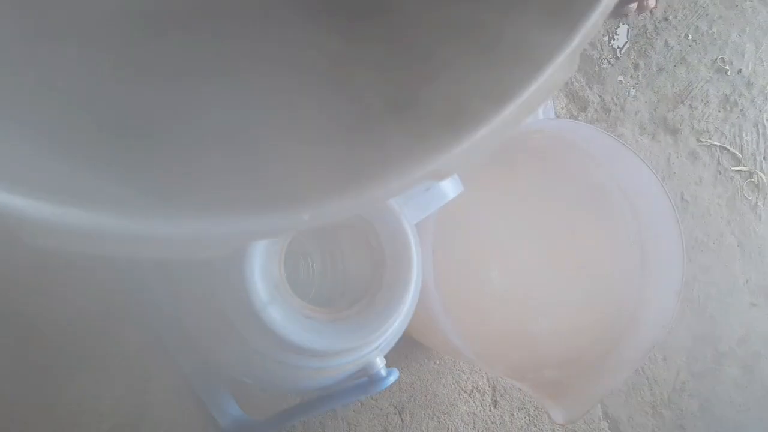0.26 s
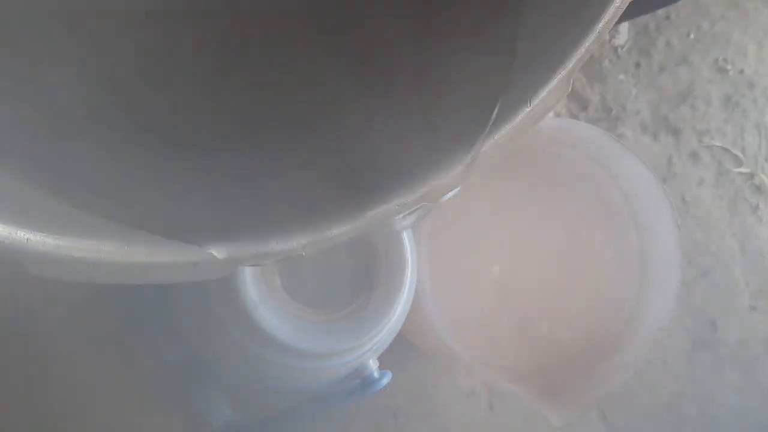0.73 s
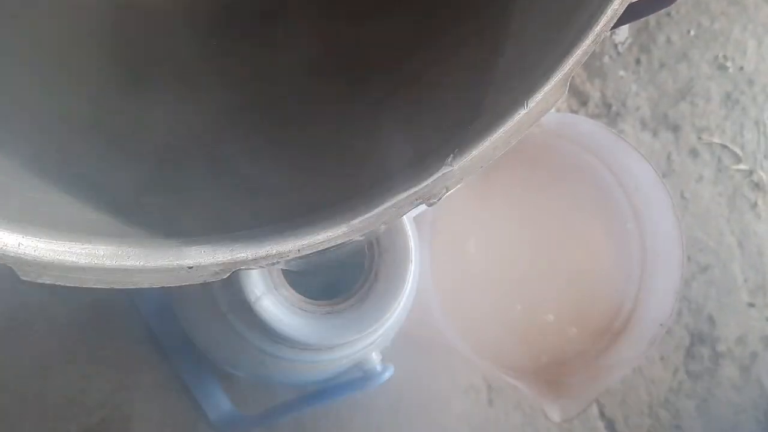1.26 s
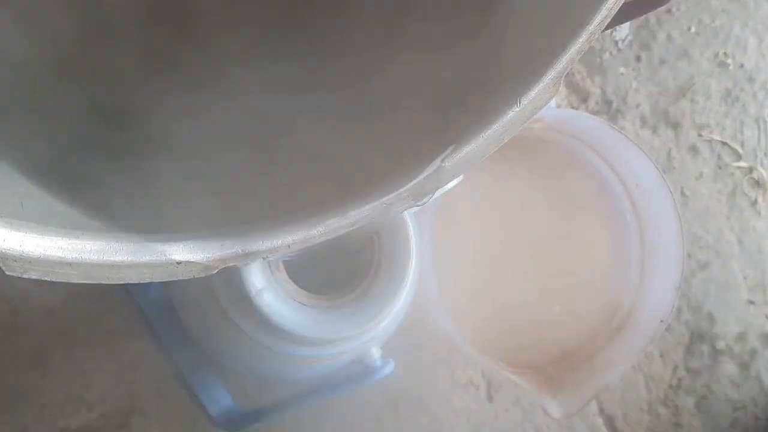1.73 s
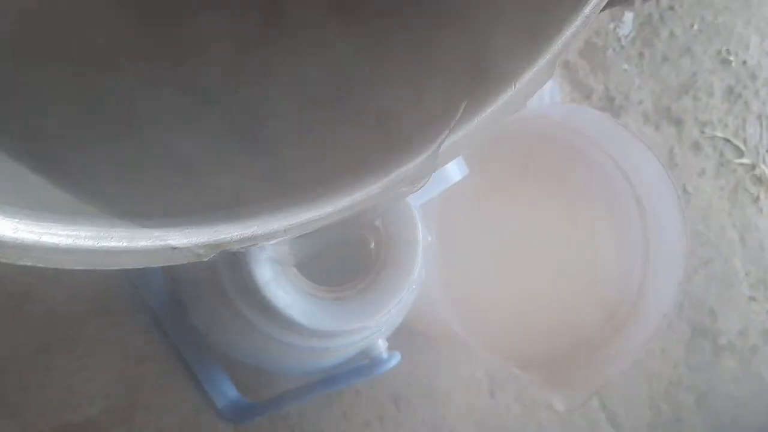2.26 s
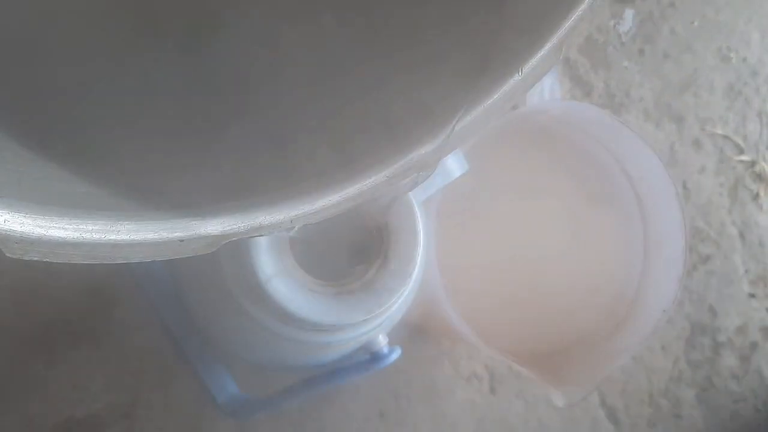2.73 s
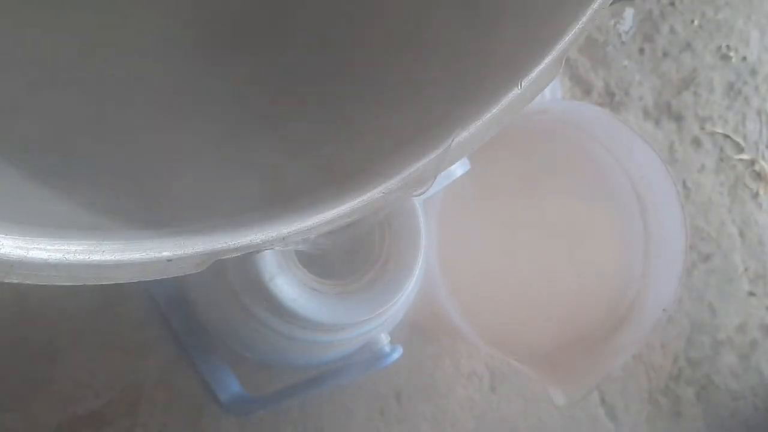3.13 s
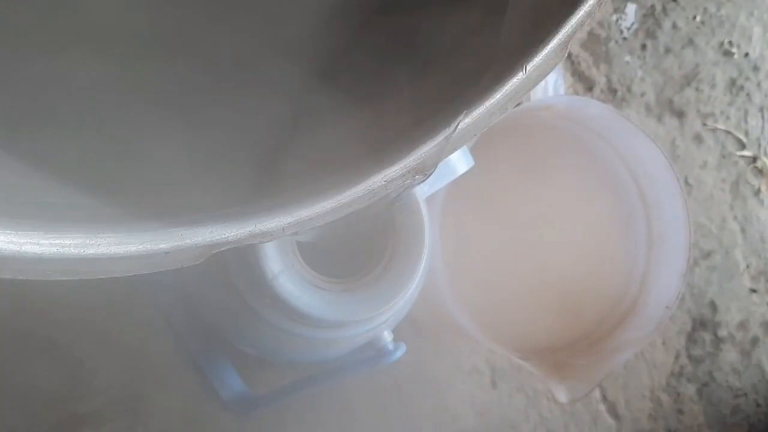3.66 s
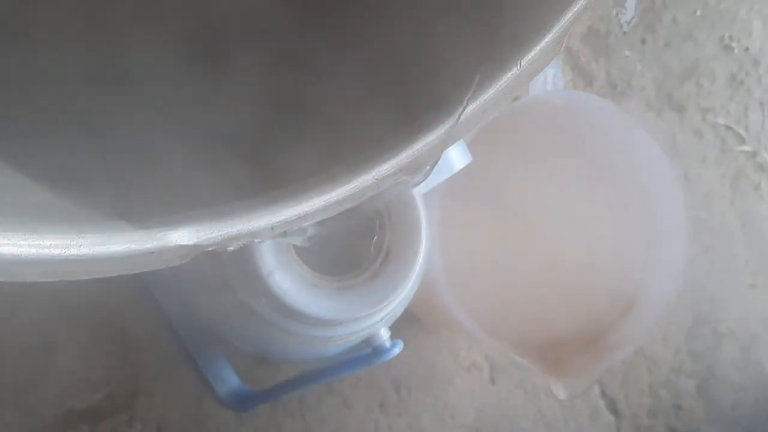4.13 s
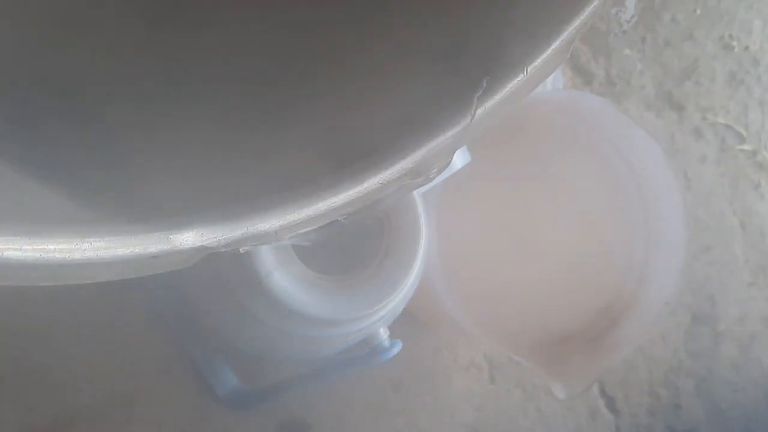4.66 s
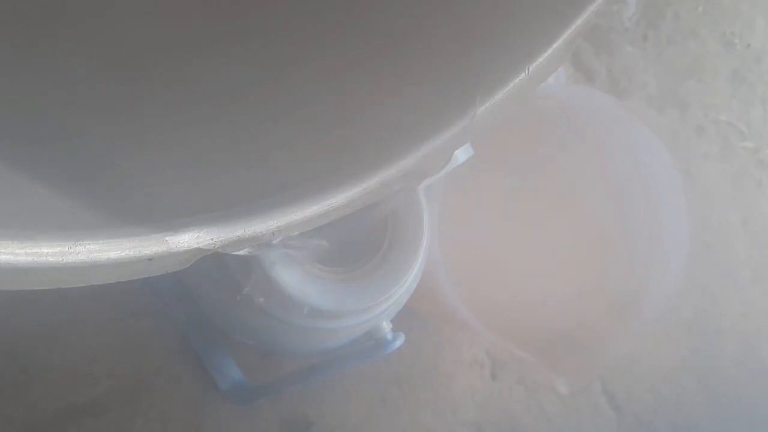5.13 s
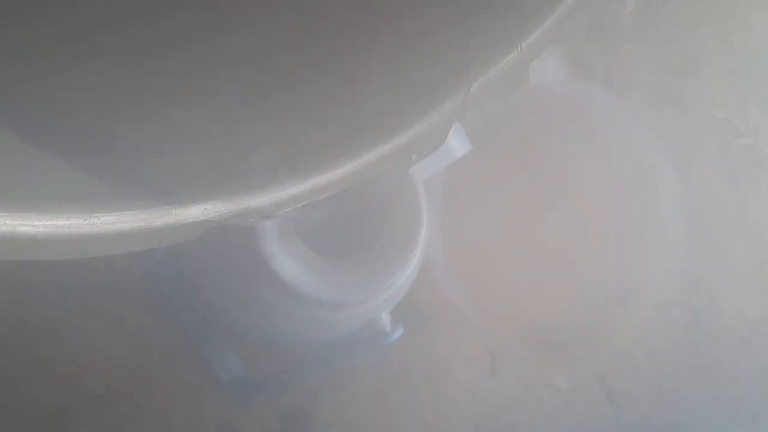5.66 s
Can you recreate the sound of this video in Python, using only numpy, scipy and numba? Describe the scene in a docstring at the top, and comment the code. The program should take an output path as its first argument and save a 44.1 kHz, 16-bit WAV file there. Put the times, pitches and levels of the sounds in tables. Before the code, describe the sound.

A quiet kitchen with low rumble, a little stronger on the left, and thin high hiss, heard closely in stereo. Around 0.1 s and again near 0.7 s the metal pot makes soft gritty scuffs and light taps. At 1.1 s water abruptly strikes the flask: bright spatter, slapping drops, and clear plinking bubbles over a hollow ring left of centre, with fine spray slightly right. The stream surges unevenly, with an especially strong splash near 2.6 s. From about 2 s low round glugs become prominent, ringing longer as the water deepens. The hollow tone climbs steadily from roughly 1.1 to nearly 2 kHz, while a low neck hum swells to about 4 s. The flow weakens from 4.8 s. At 5.0 s a hard clattering metal knock rings briefly, with smaller contacts after it. Faint scuffs follow at 5.3-5.5 s as the last thin trickle dwindles until nearly 5.9 s.

```python
"""Hot water into a vacuum flask

In a kitchen, hot water is poured from a metal pot into a vacuum flask, before two microphones.
Resonated noise and impacts make the air column, ringing higher as the flask fills; filtered clicks the spray.
Rising sine tones make the bubbles; noise and decaying metal modes the pot's scuffs and late hard knock.
Fainter kitchen reflections of both follow, over a low rumble and a thin hiss of filtered noise."""
import sys
import numpy as np
from scipy import signal
from scipy.fft import rfft, irfft, next_fast_len
from scipy.io import wavfile
from scipy.ndimage import uniform_filter1d
from numba import njit

SR = 44100
rng = np.random.default_rng(int(sys.argv[2]) if len(sys.argv) > 2 else 0)


def to_wav(s):
    """Save 16-bit WAV."""
    ch = np.atleast_2d(s).T  # columns
    pcm = np.round(np.clip(ch, -1, 1) * 32767)  # PCM
    wavfile.write(sys.argv[1], SR, pcm.astype(np.int16))


N = 259749

# All levels are relative: layer gains, panning and the microphones still act on them.


def amp(db):
    """Decibels to gain."""
    return 10 ** (np.asarray(db) / 20)


def unit(x):
    """Scale to rms 1."""
    return x / np.sqrt(np.mean(x ** 2) + 1e-20)


def even(x, span):
    """Hold the rms near 1 over the given span of seconds, keeping faster detail."""
    power = uniform_filter1d(np.mean(x ** 2, axis=0), int(span * SR) + 1)
    return x / np.sqrt(np.abs(power) + 1e-14)


def in_time(rows):
    """Each column of a curve at every sample."""
    s, *columns = np.transpose(rows)
    return [np.interp(np.arange(N) / SR, s, c) for c in columns]


def pan(db):
    """Left and right gains for a level difference; positive places the sound to the left."""
    return amp(np.array([[db], [-db]]) / 2)


def add(out, s, sound):
    """Mix a sound in at a time in seconds."""
    at = int(s * SR)
    out[:, at:at + sound.shape[-1]] += sound[..., :N - at]


def fade(t, t60):
    """Exponential decay by 60 dB in t60 seconds."""
    return np.exp(-np.log(1000) * t / t60)


def cut(x, hz, kind, order=2):
    """Butterworth filter."""
    sections = signal.butter(order, min(hz, SR / 2 - 1), kind, fs=SR, output="sos")
    return signal.sosfilt(sections, x + 1e-18)


def colour(x, spectrum):
    """Causal (minimum-phase) filter with the given spectrum and power gain 1."""
    size = 8192
    hz, db = np.transpose(spectrum)
    log_hz = np.log(np.maximum(np.fft.rfftfreq(size, 1 / SR), 1))
    # the gain falls 12 dB per halving of frequency below the first row
    below = np.minimum(log_hz - np.log(hz[0]), 0)
    gain = amp(np.interp(log_hz, np.log(hz), db)) * np.exp(2 * below)
    # folding the cepstrum makes the phase minimum
    cepstrum = irfft(np.log(gain))
    cepstrum[1:size // 2] *= 2
    cepstrum[size // 2 + 1:] = 0
    response = irfft(np.exp(rfft(cepstrum)))
    return signal.fftconvolve(x, response[None] / np.linalg.norm(response))[:, :x.shape[-1]]


def noise(alike, size=N):
    """White noise, partly shared by both channels."""
    share = np.clip(alike, 0, 1)
    common = rng.standard_normal(size)
    return np.sqrt(share) * common + np.sqrt(1 - share) * rng.standard_normal((2, size))


def drift(rate):
    """Random wander through normal values of spread 1, rate of them a second, joined by lines."""
    knots = rng.standard_normal(4096)
    return np.interp(np.arange(N) / SR * rate, np.arange(len(knots)), knots)


def grains(per_s, spread_db):
    """Random clicks: many small, a few large."""
    sizes = amp(spread_db * np.minimum(rng.exponential(1, N), 4)) * rng.choice([-1, 1], N)
    return sizes * (rng.random(N) < per_s / SR)


@njit
def resonate(x, hz, width, sr):
    """A two-pole resonance whose centre moves."""
    y, r = np.zeros_like(x), np.exp(-np.pi * width / sr)
    for i in range(2, x.shape[1]):
        a = 2 * r * np.cos(2 * np.pi * hz[i] / sr)
        for c in range(2):
            y[c, i] = x[c, i] - x[c, i - 2] + a * y[c, i - 1] - r * r * y[c, i - 2]
    return y


def bubble_cloud(low_hz, high_hz, per_s, cycles, spread_db, count=20):
    """Bubbles of many sizes ring for some cycles, each struck by its own random clicks."""
    clicks = grains(per_s, spread_db)
    dealt = rng.integers(0, count, N)
    out = np.zeros((2, N))
    clicks = clicks * noise(alike=0.73)   # scatters the bubbles between the sides
    for k, hz in enumerate(np.geomspace(low_hz, high_hz, count)):
        r, w = fade(1 / SR, cycles / hz), 2 * np.pi * hz / SR
        struck = clicks * (dealt == k) + 1e-18
        out += hz * signal.lfilter([1], [1, -2 * r * np.cos(w), r * r], struck)
    return unit(np.diff(out, prepend=0))


def bubbles(rows, swell_s, t60, rise, longer=0, slower=0):
    """Each bubble swells, rings and rises in pitch; later ones may ring longer and swell more slowly."""
    out, t = np.zeros((2, N)), np.arange(SR // 4) / SR
    for s, db, hz in rows:
        poured = s - POUR_START_S
        swell = 1 - np.exp(-(t / (swell_s + slower * poured)) ** 2)
        shape = swell * fade(t, t60 + longer * poured)
        add(out, s, amp(db) * shape / shape.max() * np.sin(2 * np.pi * hz * t * (1 + rise * t)))
    return out


POUR_START_S, POUR_ATTACK_S = 1.098, 0.0038


def poured_s():
    """Seconds since the stream reached the flask, at every sample."""
    return np.maximum(np.arange(N) / SR - POUR_START_S, 0)


DEEP_S, DEEPENS_S = 2.4, 0.27   # when the water starts to count as deep, and how long the change takes


def depth():
    """0 while the water is shallow, 1 once it is deep, at every sample."""
    return np.clip((np.arange(N) / SR - DEEP_S) / DEEPENS_S, 0, 1)


USUAL_FLOW_DB = -46.5


def follow(flow_db, db, share):
    """Gain of a layer that has level db at the usual flow and follows a share of the flow's swing."""
    return amp(db + share * (flow_db - USUAL_FLOW_DB))


# strength of the stream, as the level of its splash: t/s, level/dB
STREAM_STRENGTH = [(1.1, -52), (1.24, -44), (1.43, -55), (1.52, -57), (1.64, -55.5), (1.8, -55),
                   (1.92, -54), (2.05, -48.5), (2.22, -52), (2.5, -46.5), (2.78, -49.5), (2.91, -55),
                   (3.1, -50), (3.6, -48.5), (4.3, -53.5), (4.44, -50), (4.8, -55), (5.35, -58), (5.7, -65)]
# moments when the stream thickens: t/s, splash level/dB, t60/s
STREAM_GUSHES = [(1.107, -38.5, 0.12), (1.179, -38.5, 0.19), (1.301, -41, 1), (1.469, -38.5, 0.25),
                 (1.531, -41.5, 0.2), (1.585, -45, 0.1), (1.675, -39, 0.11), (1.731, -36.5, 0.1),
                 (1.765, -39, 0.29), (2.0, -43, 0.26), (2.079, -46.5, 0.95), (2.238, -42.5, .12),
                 (2.323, -42, 0.11), (2.568, -29.5, 0.064), (2.63, -38.5, 0.17), (2.674, -51, 0.18),
                 (3.039, -37, 0.1), (3.16, -50, 0.12), (3.255, -41, 0.16), (3.44, -48, 0.32),
                 (3.533, -40.5, 0.46), (3.8, -47, 0.5), (4.23, -58, 0.076), (4.48, -42, 0.24)]


def gushes():
    """The stream's level in dB with its gushes: each swells at once, dies away and adds in power."""
    t = np.arange(SR // 2) / SR
    power = amp(in_time(STREAM_STRENGTH)[0] + 1.9 * drift(rate=28))[None] ** 2
    for s, db, t60 in STREAM_GUSHES:
        swell = 1 - np.exp(-t / 0.002)
        add(power, s, (amp(db) * swell * fade(t, t60)) ** 2)
    return 10 * np.log10(power[0])


def strays(count, until_s, db, spread_db, low_hz=1, high_hz=1):
    """Events at random moments of the pour, partly following the flow: rows of t/s, level/dB, f/Hz."""
    when, strength, size = rng.random((count, 3)).T
    s = POUR_START_S + when * (min(until_s, POT_KNOCKS[0][0]) - POUR_START_S)
    flow_db = np.interp(s, *np.transpose(STREAM_STRENGTH))
    level_db = db + 0.46 * (flow_db - USUAL_FLOW_DB) - spread_db * strength
    return np.transpose([s, level_db, low_hz * (high_hz / low_hz) ** size])


# second resonance of the air column as the water rises: t/s, f/Hz
AIR_PITCH = [(1.1, 1066), (1.5, 1090), (2.0, 1141), (2.5, 1218), (3.0, 1335), (3.4, 1421), (3.8, 1456),
             (4.4, 1517), (5.0, 1694), (5.5, 1720), (5.89, 1980)]
# level of the column's ring against the splash: t/s, level/dB
AIR_RING = [(1.2, -5.5), (1.75, -3), (2.85, -10), (3.1, -1), (3.6, -2.5), (3.87, 2.5), (4.4, 2.5),
            (4.8, -4), (5.89, 5.5)]
# upper air resonances early in the pour: f/Hz, width/Hz, level/dB, power with which they follow the fill
UPPER_RESONANCES = [(2032, 71, 10, 0.79), (2830, 80, 6, 0.502), (3620, 61, 2, 0.54), (4900, 150, -2, 0.44),
                    (6820, 80, 0.5, 0.15)]
# froth near the neck blurs the ring from here on
FROTH_S, FROTH_RISE_S = 4.16, 0.45
# flicker of the upper resonances in shallow and in deep water
UPPER_FLICKER_DB, UPPER_DEEP_FLICKER_DB = 9, 5.5
# share by which the surface shakes the pitch: extra in deep water, and of the upper resonances there
SLOSH_DEEP, UPPER_SLOSH = 0.0077, 0.013


def air_column(flow_db):
    """Impacts of the stream ring the shrinking air space, left of the middle."""
    fill_hz, = in_time(AIR_PITCH)
    ring_db = flow_db + in_time(AIR_RING)[0]
    impacts = unit(grains(per_s=230, spread_db=4))
    drive = (impacts + .5 * noise(alike=0.073)) * amp(1.5 * drift(rate=45))
    # the heaving surface shakes the pitch
    sloshed_hz = fill_hz * (1 + (0.017 + SLOSH_DEEP * depth()) * drift(rate=130))
    frothed_hz = fill_hz * (1 + 0.034 * drift(rate=120))
    froth = np.clip((np.arange(N) / SR - FROTH_S) / FROTH_RISE_S, 0, 1)
    clear = unit(resonate(drive, sloshed_hz, 25.5, SR))
    blurred = unit(resonate(drive, frothed_hz, 55.0, SR))
    second = even((1 - froth) * clear + froth * blurred, span=0.12)
    upper = 0
    flicker_db = UPPER_FLICKER_DB + (UPPER_DEEP_FLICKER_DB - UPPER_FLICKER_DB) * depth()
    for hz, width, db, power in UPPER_RESONANCES:
        own_drive = drive * amp(flicker_db * drift(rate=60))   # each resonance flickers by itself
        shake = (UPPER_SLOSH * depth() + 0.014 * froth) * drift(rate=130)
        moving_hz = hz * (fill_hz / AIR_PITCH[1][1]) ** power * (1 + shake)
        upper = upper + amp(db) * unit(resonate(own_drive, moving_hz, float(width), SR))
    # froth makes the upper resonances slightly fuller
    upper_gain = amp(flow_db - 6.5 + 0.5 * froth)
    return second * amp(ring_db) * pan(db=4.0) + even(upper, span=0.064) * upper_gain * pan(db=15.5)


# heavy slugs of water: t/s, second-resonance level/dB, third-resonance level/dB
WATER_SLUGS = [(1.1064, -47, -40.5), (1.191, -28.5, -48), (1.232, -43, -35), (1.344, -35.5, -36.5),
               (1.416, -36.5, -38), (1.461, -29, -35.5), (1.528, -40.5, -37.5), (1.68, -41, -37),
               (1.7299, -42, -58), (3.265, -35.5, -42), (3.577, -40, -56), (3.799, -31, -57),
               (3.824, -34, -59), (3.867, -34, -55)]


def plops():
    """Each slug rings the second and third resonances of the air column."""
    s, second_db, third_db = np.transpose(WATER_SLUGS)
    second_hz = np.interp(s, *np.transpose(AIR_PITCH))
    early_hz, _, _, power = UPPER_RESONANCES[0]
    third_hz = early_hz * (second_hz / AIR_PITCH[1][1]) ** power
    second = bubbles(zip(s, second_db, second_hz), swell_s=0.0036, t60=0.12, rise=0.073)
    third = bubbles(zip(s, third_db, third_hz), swell_s=0.004, t60=0.12, rise=0.033)
    return (second + third) * amp(0.5) * pan(db=3.0)


# brightness of the spray: f/Hz, level/dB
SPRAY_COLOUR = [(1600, 0), (2500, 0.5), (3500, 3.5), (4400, -2.5), (5400, 0.5), (6200, -0.5), (9800, -0.5),
                (12000, -5.5), (16000, -13.5)]
SPRAY_DB, SPRAY_FOLLOWS = -44, 0.78
SPRAY_RISE_DB_PER_S = .5   # the spray comes closer to the mouth as the flask fills


def spray(flow_db):
    """Fine droplets crackle and tiny bubbles fizz, a little to the right."""
    ticks = unit(grains(per_s=1800, spread_db=6.0) * noise(alike=0.0066))
    crackle = (ticks + noise(alike=0.033)) * amp(6.8 * drift(rate=83))
    fizz = bubble_cloud(3960, 12300, per_s=1200, cycles=110, spread_db=2.5, count=40)
    blips = bubble_cloud(2320, 5350, per_s=2200, cycles=130, spread_db=6.5, count=30)
    mist = even(colour(crackle + 0.16 * fizz, SPRAY_COLOUR), span=0.18)
    mist = mist * follow(flow_db, SPRAY_DB + SPRAY_RISE_DB_PER_S * poured_s(), SPRAY_FOLLOWS)
    blip_gain = amp(flow_db - 3.0 - 0.5 * depth())   # slightly weaker in deep water
    return mist * pan(db=-2.4) + even(blips, span=0.26) * blip_gain * pan(db=-1.5)


# colour of the burble: f/Hz, level/dB
BURBLE_COLOUR = [(290, 1.5), (450, -4), (620, -9.5), (850, -21), (1300, -23.5), (2000, -13.5), (3000, -33),
                 (16000, -113)]
BURBLE_DB, BURBLE_FOLLOWS = -51, 0.33
BOTTOM_DB, BOTTOM_S = -2.5, 0.93   # the burble starts weaker and recovers over about this time
RUMBLE_DB, RUMBLE_FOLLOWS = -41.5, 0.4
RUMBLE_FULL_S, RUMBLE_SINK_DB_PER_S = 2, 4.5   # the rumble builds up, then deeper water softens it
# the neck's hum swells as the flask fills, then dies away
HUM_DB, HUM_FULL_S, HUM_SWELL_DB_PER_S = -36.5, 3.82, 5
HUM_END_S, HUM_FALL_DB_PER_S = 4.77, 13
JOLT_DB, JOLT_T60_S = -25.5, 0.29   # the first knock jolts the air in the neck


def churn(flow_db):
    """Middling bubbles burble, the water rumbles and the air in the neck hums, rising slowly with the fill."""
    t, (fill_hz,) = np.arange(N) / SR, in_time(AIR_PITCH)
    swell_db = HUM_SWELL_DB_PER_S * np.maximum(HUM_FULL_S - t, 0)
    fall_db = HUM_FALL_DB_PER_S * np.maximum(t - HUM_END_S, 0)
    hum_db = HUM_DB - swell_db - fall_db
    since_knock = t - POT_KNOCKS[0][0]
    jolt = amp(JOLT_DB) * (since_knock > 0) * fade(np.abs(since_knock), JOLT_T60_S)
    neck_hz = 200 * (fill_hz / AIR_PITCH[1][1]) ** 0.443 * (1 + 0.021 * drift(rate=20))
    neck = cut(resonate(noise(alike=0.95), neck_hz, 10.8, SR), 330, "low")
    hum = even(neck, span=0.12) * (amp(hum_db + 5 * drift(rate=17)) + jolt)
    cloud = bubble_cloud(285.0, 1460, per_s=800, cycles=8.9, spread_db=5.0)
    bottom_db = BOTTOM_DB * np.exp(-(poured_s() / BOTTOM_S) ** 2)
    burble = even(colour(cloud + .5 * noise(alike=0.14), BURBLE_COLOUR), span=0.176)
    burble = burble * follow(flow_db, BURBLE_DB + bottom_db, BURBLE_FOLLOWS)
    # the rumble rings at one low pitch
    low_ring = unit(resonate(noise(alike=1.0), np.full(N, 107.5), 3.8, SR))
    low_noise = unit(cut(cut(noise(alike=1.0), 122, "high"), 101.4, "low", order=4))
    low = low_noise + amp(-2.5) * cut(low_ring, 164, "low")
    rumble_db = RUMBLE_DB - RUMBLE_SINK_DB_PER_S * np.abs(t - RUMBLE_FULL_S)
    rumble = unit(low) * follow(flow_db, rumble_db, RUMBLE_FOLLOWS)
    return (hum + burble + rumble) * pan(db=3.5)


# large trapped bubbles: t/s, level/dB, starting f/Hz
LARGE_BUBBLES = [(1.172, -27, 407), (1.238, -32.5, 321), (1.26, -42, 510), (1.324, -33.5, 446),
                 (1.342, -27.5, 390), (1.444, -25.5, 219), (1.45, -27.5, 366), (1.459, -24, 203),
                 (1.483, -33, 432), (1.275, -39.5, 630), (1.47, -38, 550), (1.505, -28.5, 356),
                 (1.544, -33, 320), (1.552, -26, 258), (1.68, -24, 234), (1.822, -29.5, 291),
                 (1.919, -33.5, 426), (1.946, -23.5, 227), (2.106, -19.5, 221), (2.235, -39, 342),
                 (2.24, -14, 211), (2.321, -21.5, 231), (2.385, -29.5, 290), (2.569, -24.5, 172),
                 (2.627, -28, 216), (2.667, -38, 298), (2.671, -19.5, 216), (2.806, -26.5, 229),
                 (2.839, -24.5, 221), (3.07, -23, 227), (3.159, -20, 224.3), (3.191, -23.5, 219),
                 (3.262, -19.5, 218.6), (3.334, -23, 232), (3.416, -24, 223), (3.447, -24, 228),
                 (3.535, -20.5, 227), (3.564, -20, 222), (3.631, -19.5, 219), (3.777, -22.5, 222),
                 (3.794, -33.5, 394), (3.801, -14.5, 223.6), (3.969, -25, 224), (4.033, -18, 215.6),
                 (4.076, -24, 228), (4.11, -18.5, 231), (4.132, -19.5, 229), (4.197, -23, 220.4),
                 (4.252, -18, 226.8), (4.307, -22.5, 221), (4.391, -18, 237), (4.477, -20, 226.6),
                 (4.548, -22, 217.5), (4.716, -20.5, 234), (4.928, -23, 249)]


def gulps():
    """Large trapped bubbles ring low, longer and with a slower swell as the flask fills."""
    stray = strays(count=8, until_s=2.9, db=-26, spread_db=11.0, low_hz=172.0, high_hz=320)
    # shallow water traps smaller ones
    smaller = strays(count=10, until_s=2.2, db=-32, spread_db=1, low_hz=290, high_hz=519)
    rows = np.vstack([LARGE_BUBBLES, stray, smaller])
    ringing = bubbles(rows, swell_s=0.0026, t60=0.056, rise=0.19, longer=0.018, slower=0.0022)
    return ringing * amp(-2.0) * pan(db=4.0)


def glugs():
    """Water churns around each listed large bubble: a dull burst of noise."""
    gain, t = np.zeros((1, N)), np.arange(SR // 4) / SR
    for s, db, _ in LARGE_BUBBLES:
        add(gain, s, amp(db - 25.5) * (1 - np.exp(-t / 0.0047)) * fade(t, t60=0.12))
    dull = unit(cut(cut(noise(alike=1.0), 210, "high"), 500, "low", order=4))
    return gain * dull * pan(db=3.0)


GURGLE_DB, GURGLE_S, GURGLE_SPAN_S = -58.5, 3.93, 2.05   # level, time of the fullest gurgle, spread


def gurgle():
    """A dense run of round bubbles above the hum of the neck, in the middle of the stereo field."""
    cloud = bubble_cloud(380, 835, per_s=350, cycles=25, spread_db=5)
    swell = np.exp(-((np.arange(N) / SR - GURGLE_S) / GURGLE_SPAN_S) ** 2)
    return even(cut(cloud, 400, "low", order=1), span=0.315) * amp(GURGLE_DB) * swell * pan(db=0.0)


# drops that slap the water: t/s, level/dB, left minus right level/dB
SLAPPING_DROPS = [(1.043, -31.5, -5), (1.1814, -45, 4), (1.3907, -22, 2), (1.5514, -26.5, 1),
                  (1.732, -24.5, 0.0), (1.856, -23.5, -2), (1.9015, -27.5, 0), (2.003, -24, 2),
                  (2.008, -22.5, -6), (2.0785, -25, -3), (2.426, -38, -2), (2.5711, -24, 0),
                  (2.6314, -26.5, -2), (2.7569, -22.5, -2), (2.991, -25, -2), (3.0694, -23, 0),
                  (3.2555, -22.5, -2), (3.325, -31, 4), (3.5663, -23.5, -2), (3.7996, -24.5, -4),
                  (4.1688, -27.5, -8), (4.3974, -25.5, -2), (4.5463, -25, 1), (5.3647, -28.5, -3)]


def drops(t60, gain_db, spatter_db, spatter_t60):
    """Single drops slap with a short bright burst and leave a little spatter; others fall at random."""
    out, t = np.zeros((2, N)), np.arange(SR // 8) / SR
    stray = strays(count=10, until_s=2.1, db=-31.0, spread_db=14)
    rows = list(SLAPPING_DROPS) + [(s, db, 0) for s, db, _ in stray]
    for s, db, side_db in rows:
        decay = fade(t, t60) + amp(spatter_db) * fade(t, spatter_t60)
        shape = (1 - np.exp(-t / 0.0007)) * decay
        add(out, s, amp(db + gain_db) * pan(side_db) * noise(alike=0.11, size=len(t)) * shape)
    return colour(out, [(2200, 2.0), (4000, 7.0), (7000, 10.0), (11000, 9.0), (16000, -3.0)])


# small clear bubbles: t/s, level/dB, starting f/Hz
SMALL_BUBBLES = [(1.1303, -26, 2000), (1.2261, -29, 2000), (1.2555, -22, 2130), (1.4691, -25, 2100),
                 (1.471, -29, 1500), (1.5299, -23.5, 2160), (1.531, -30, 1520), (1.6711, -24.5, 3590),
                 (1.73, -23.5, 3100), (1.7694, -20, 3750), (2.0547, -19, 3540), (2.079, -26, 2030),
                 (2.1765, -24, 4530), (2.4245, -25, 3410), (2.4823, -21.5, 3070), (2.5112, -25, 2720),
                 (2.5511, -20.5, 2170), (2.6304, -26, 2010), (2.7222, -21, 4160), (3.0395, -27, 2490),
                 (3.5668, -26, 2600), (4.23, -26, 1570), (4.2313, -31, 2500)]


def plinks(pitch_spread, lag_s, follower_db):
    """A small bubble is followed by a cluster of weaker ones of about its size."""
    stray = strays(count=22, until_s=1.9, db=-32.0, spread_db=12, low_hz=2170, high_hz=4470)
    rows = [np.vstack([SMALL_BUBBLES, stray])]
    s, db, hz = rows[0].T
    for _ in range(6):
        wait, size = rng.random((len(s), 2)).T
        near_hz = hz * np.exp(pitch_spread * (2 * size - 1))
        rows.append(np.transpose([s + lag_s * wait, db + follower_db, near_hz]))
    return bubbles(np.vstack(rows), swell_s=0.00012, t60=0.023, rise=0.14) * amp(-8.0) * pan(db=6.0)


# bursts of bubbles of about one size: t/s, length/s, upper limit of level/dB, central starting f/Hz
BUBBLE_BURSTS = [(1.308, 0.08, -31.5, 3020), (1.72, 0.041, -30.5, 3100), (1.759, 0.045, -31, 3920),
                 (2.001, .015, -33, 4560), (2.047, .045, -32, 2890), (2.437, 0.048, -34, 2600),
                 (2.502, .035, -32, 2850), (2.557, .03, -29.5, 3320), (2.624, 0.021, -35, 2800)]


def bursts(pitch_spread, spread_db, count):
    """A pocket of air breaks into many small bubbles that ring together."""
    rows = []
    for s, length, db, hz in BUBBLE_BURSTS:
        when, strength, size = rng.random((count, 3)).T
        near_hz = hz * np.exp(pitch_spread * (2 * size - 1))
        rows += zip(s + length * when, db - spread_db * strength, near_hz)
    return bubbles(rows, swell_s=0.0008, t60=0.048, rise=0.08) * amp(-7.5) * pan(db=5.5)


def chirps():
    """Tiny separate bubbles chirp slightly upward in the spray, well to the right."""
    rows = strays(count=50, until_s=4.6, db=-39, spread_db=9, low_hz=4100, high_hz=9000)
    return bubbles(rows, swell_s=0.0006, t60=0.024, rise=0.69) * pan(db=-8.0)


# the pot's knocks: t/s, level/dB, contact brightness f/Hz, time in contact/s, rattle level/dB
POT_KNOCKS = [(4.9732, -23, 2400, 0.016, 8), (4.998, -26, 700, 0.015, -7), (5.0217, -7.5, 160, 0.013, -18),
              (5.0388, -7.5, 6300, 0.028, -3.5), (5.088, -25, 900, 0.016, -31),
              (5.127, -21, 700, 0.0257, 2), (5.183, -21, 120, 0.01, -20)]
# pitches of the pot's body: f/Hz
POT_PITCHES = [229, 280, 357, 426, 473, 639, 746, 879, 1028, 1743, 2500, 2702]
# what rings in a knock, one row for each of those pitches: level/dB, t60/s
POT_RINGING = [(-15, 0.2), (-10, 0.22), (-1, 0.3), (3.5, 0.52), (-7.5, 0.31), (-9, 0.32), (-14.5, 0.26),
               (-22, 0.25), (-5, 0.25), (-5, 0.05), (-21, 0.36), (-33, 0.18)]
# colour of the rattle: f/Hz, level/dB
RATTLE_COLOUR = [(230, -9), (420, -2), (600, -9.5), (1000, -11), (1300, -13), (1750, -17.5), (2100, -20),
                 (2600, -17), (3500, -24.5), (6000, -30), (10000, -28), (16000, -32)]
# colour of the crack: f/Hz, level/dB
CRACK_COLOUR = [(900, -12), (1750, -1.5), (2500, -27), (4000, -4), (8000, -10), (16000, -5)]


def knocks(clatter_t60, release_db, release_s):
    """A blow cracks, rings strongly while the pot presses on, then faintly; some contacts are duller."""
    out, t = np.zeros((2, N)), np.arange(SR // 2) / SR
    for s, db, bright_hz, contact_s, rattle_db in POT_KNOCKS:
        modes = sum(amp(level) * np.sin(2 * np.pi * hz * t) * fade(t, t60)
                    for hz, (level, t60) in zip(POT_PITCHES, POT_RINGING))
        pressed = amp(release_db * np.clip((t - contact_s) / release_s, 0, 1))
        rattle = colour(noise(alike=0.26, size=len(t)) * fade(t, clatter_t60), RATTLE_COLOUR)
        crack = colour(noise(alike=0.15, size=len(t)) * fade(t, t60=0.028), CRACK_COLOUR)
        blow = modes * pressed + amp(rattle_db - 2.5) * (rattle + amp(-0.5) * crack)
        add(out, s, amp(db) * cut(blow, bright_hz, "low", order=1))
    out = cut(out, 195, "high", order=6)
    # the sound reaches the right microphone first, the left 0.467 ms later
    left = np.interp(np.arange(N) - 0.000467 * SR, np.arange(N), out[0])
    return np.array([left, out[1]]) * pan(db=2.5)


# soft scuffs of the pot: t/s, level/dB, t60/s, swell/s, brightness f/Hz
POT_SCUFFS = [(0.078, -30.5, 0.23, 0.013, 2400), (0.141, -40, 0.32, 0.0021, 6000),
              (0.659, -43, 0.11, 0.002, 9000), (0.664, -33.5, 0.32, 0.05, 1090),
              (5.307, -41, 0.56, 0.024, 6000), (5.365, -36, 0.046, 0.00079, 12000),
              (5.474, -36.5, 0.29, 0.0013, 1730)]
# colour of the scuffs and taps: f/Hz, level/dB
SCUFF_COLOUR = [(220, 0), (370, 3.5), (650, -13.5), (950, -11.5), (1300, -13), (1600, -6), (1950, -11.5),
                (2600, -7), (3500, -15.5), (7000, -18), (16000, -17)]
# the swish's level against its scuff, time to swell and to die away (60 dB each)
SWISH_DB, SWISH_RISE_S, SWISH_T60_S = -19, 0.52, 1.6


def scuffs():
    """Short gritty rubs that die away, each with a faint dry swish around it."""
    out, t = np.zeros((2, N)), np.arange(SR // 2) / SR
    swish_gain = 0
    for s, db, t60, swell_s, bright_hz in POT_SCUFFS:
        rub = noise(alike=0.24, size=len(t)) * (1 - np.exp(-t / swell_s)) * fade(t, t60)
        add(out, s, amp(db) * cut(rub, bright_hz, "low", order=1))
        since = np.arange(N) / SR - s
        swell = fade(np.abs(since), np.where(since < 0, SWISH_RISE_S, SWISH_T60_S))
        swish_gain = np.maximum(swish_gain, amp(db + SWISH_DB) * swell)
    broad = resonate(noise(alike=0.094), np.full(N, 2490.0), 2900.0, SR)
    swish = unit(cut(broad, 3430, "low", order=4))
    gritty = out * amp(1.53 * drift(rate=190))
    return colour(gritty, SCUFF_COLOUR) * amp(5.0) + swish * swish_gain


# light taps of the pot near the scuffs: t/s, level/dB, brightness f/Hz
POT_TAPS = [(0.0856, -36, 2500), (0.146, -36, 4000), (0.658, -46.5, 4000), (0.676, -32.5, 500)]


def taps(t60):
    """Light, dry contacts: short noise with the colour of the scuffs."""
    out, t = np.zeros((2, N)), np.arange(SR // 8) / SR
    for s, db, bright_hz in POT_TAPS:
        contact = noise(alike=0.11, size=len(t)) * fade(t, t60)
        add(out, s, amp(db) * cut(contact, bright_hz, "low", order=1))
    return colour(out, SCUFF_COLOUR) * amp(4.5)


# faint squeaks of the pot's rim: t/s, level/dB, length/s, f/Hz
RIM_SQUEAKS = [(.875, -62, .085, 4020)]


def squeak():
    """The rim sounds a thin sine tone that swells and fades."""
    out = np.zeros((2, N))
    for s, db, length, hz in RIM_SQUEAKS:
        t = np.arange(int(length * SR)) / SR
        add(out, s, amp(db) * np.sin(np.pi * t / length) * np.sin(2 * np.pi * hz * t))
    return out


def kitchen(x, t60, wall_hz):
    """Diffuse reflections, dulled by the walls, different on each side."""
    t = np.arange(SR) / SR
    late = t > .004   # nothing comes back in the first 4 ms
    tail = cut(noise(alike=0.71, size=SR) * fade(t, t60) * late, wall_hz, "low", order=1)
    return signal.fftconvolve(x, unit(tail) / np.sqrt(SR), axes=1)[:, :N]


# colour of the kitchen's floor of noise: f/Hz, level/dB
FLOOR_COLOUR = [(15, -42), (25, -32), (102, -2), (153, -15.5), (200, -16), (249, -14), (277, -23),
                (416, -22), (463, -31.5), (3620, -50.5), (3920, -57), (4250, -51), (9070, -35),
                (10700, -73), (16000, -111)]
# colour of the hiss: f/Hz, level/dB
HISS_COLOUR = [(5000, -6), (6800, -7), (7800, 1), (9800, 3.5), (11000, -7.5), (16000, -13.5)]
# the hiss softens at the end: t/s, level/dB
HISS_STRENGTH = [(5.1, -54), (5.6, -56.5)]
FLOOR_DB = -45


def background():
    """A low rumble common to both sides and stronger on the left, a diffuse floor and a thin high hiss."""
    air = cut(noise(alike=1.0), 260, "low") * pan(db=4.5) + cut(noise(alike=0.086), 286, "high")
    hiss = amp(in_time(HISS_STRENGTH)[0]) * colour(noise(alike=0.024), HISS_COLOUR)
    return amp(FLOOR_DB) * colour(air, FLOOR_COLOUR) + hiss


# colour of the two microphones: f/Hz, left level/dB, right level/dB
MICROPHONE_COLOUR = [(500, -0.5, 0), (810, 3, -0.5), (1080, -2, 1), (1240, -1.5, -5.5), (1460, 1.5, -3),
                     (1850, 2, -5), (2400, 1.5, -3.5), (3100, 1, -7.5), (4300, -1, -2), (5430, -3, 0.5),
                     (6300, -2, -2.5), (6600, 1, -5), (8400, -3, -1), (11500, -0.5, -1.5), (15500, 0.5, -3)]
DIP_HZ, DIP_WIDTH_HZ, DIP_DEPTH = 3945, 104, 0.43   # depth as the share of the peak taken away


def microphones(x):
    """Each side has its own colour; both dip narrowly in the treble."""
    hz, *sides = np.transpose(MICROPHONE_COLOUR)
    size = next_fast_len(N + SR // 10)
    gain = amp([np.interp(np.fft.rfftfreq(size, 1 / SR), hz, db) for db in sides])
    x = irfft(rfft(x, size) * gain, size)[:, :N]
    peak = signal.lfilter(*signal.iirpeak(DIP_HZ, DIP_HZ / DIP_WIDTH_HZ, fs=SR), x)
    return x - np.clip(DIP_DEPTH, 0, 1) * peak


def scene():
    """Water, pot and room together."""
    flow_db = gushes()
    pouring = np.minimum(poured_s() / POUR_ATTACK_S, 1)
    water = pouring * (air_column(flow_db) + spray(flow_db) + churn(flow_db) + gurgle())
    water += plops() + gulps() + glugs() + chirps()
    water += bursts(pitch_spread=0.249, spread_db=11.5, count=12)
    water += plinks(pitch_spread=0.22, lag_s=0.019, follower_db=-15.5)
    water += drops(t60=0.018, gain_db=-2.0, spatter_db=-20.5, spatter_t60=0.28)
    pot = knocks(clatter_t60=0.23, release_db=-21.0, release_s=0.0055)
    pot += scuffs() + taps(t60=0.048) + squeak()
    room = amp(-14.0) * kitchen(water, t60=0.22, wall_hz=7100)
    room += amp(-17.0) * kitchen(pot, t60=0.29, wall_hz=4160)
    return water + pot + room + background()


def record(dry):
    """The microphones colour the sound, the loudest peaks are rounded and the top is cut steeply."""
    rounded = .85 * np.tanh(microphones(dry) / .85)
    steep = signal.ellip(10, .1, 90, 16300, fs=SR, output="sos")   # cut above 16300 Hz
    return signal.sosfilt(steep, rounded)


dry = scene()
out = record(dry)
to_wav(out)
```